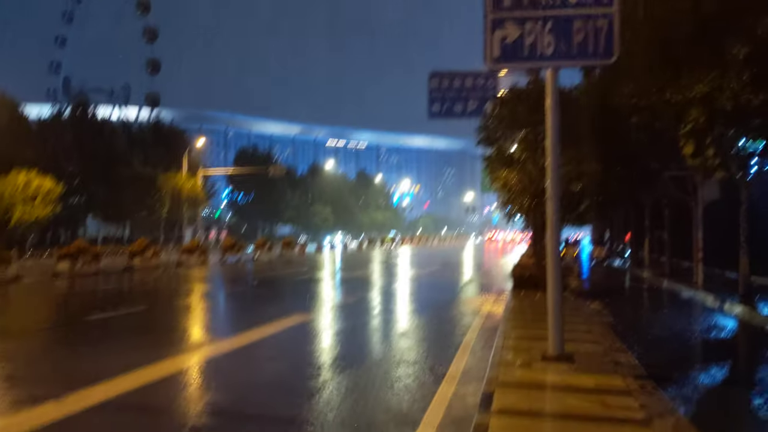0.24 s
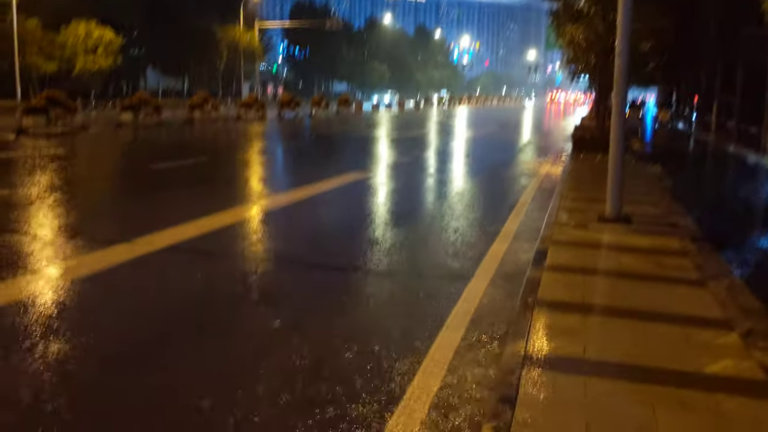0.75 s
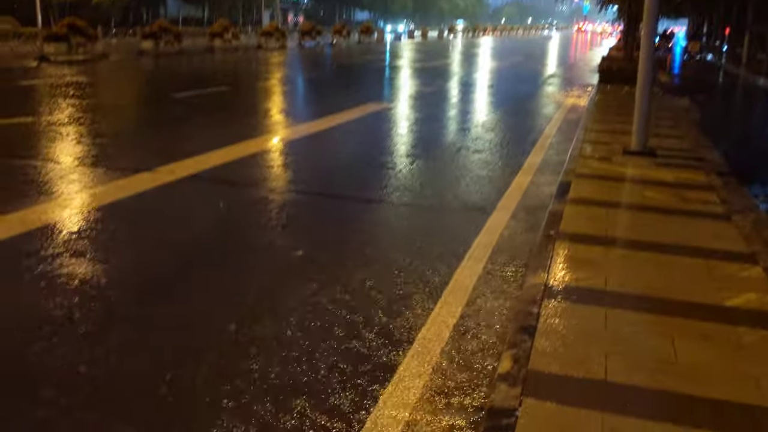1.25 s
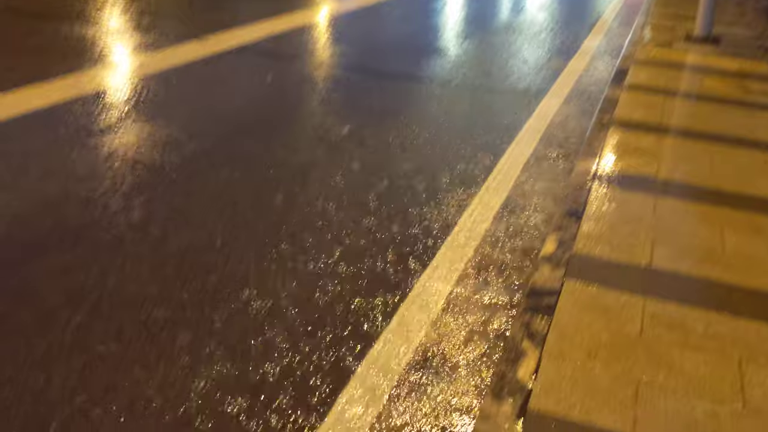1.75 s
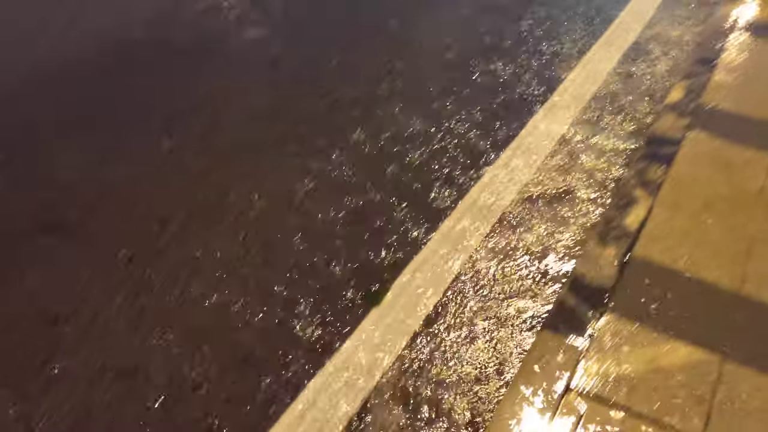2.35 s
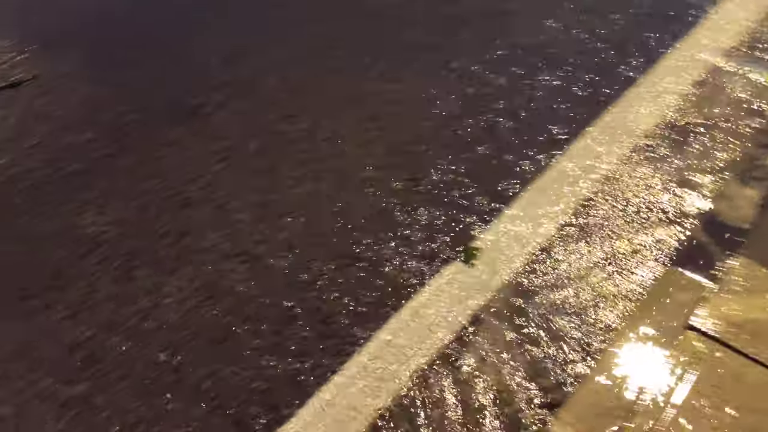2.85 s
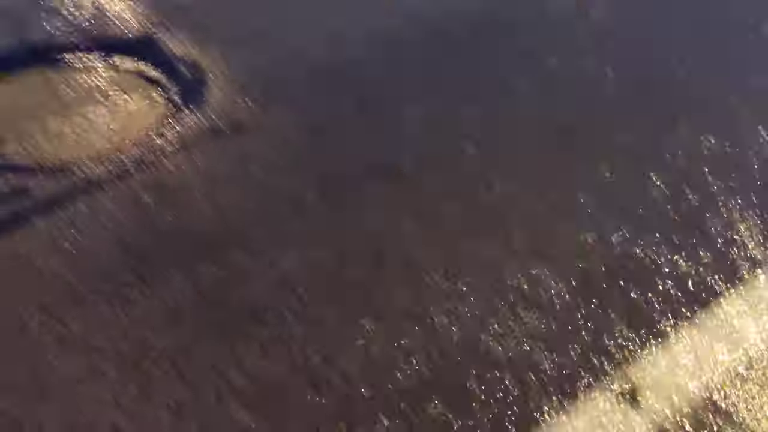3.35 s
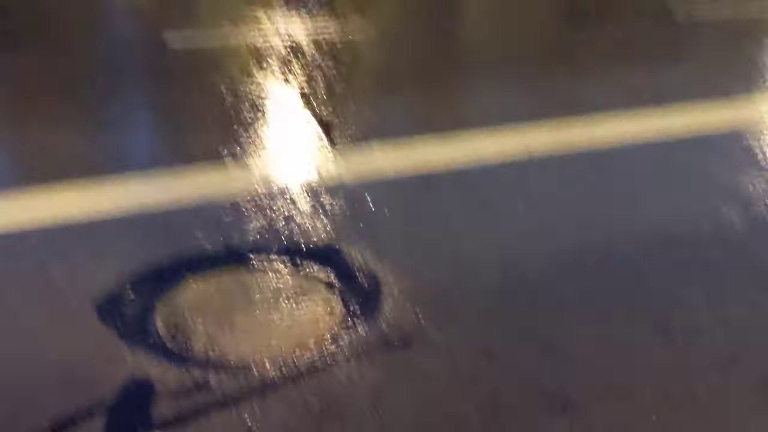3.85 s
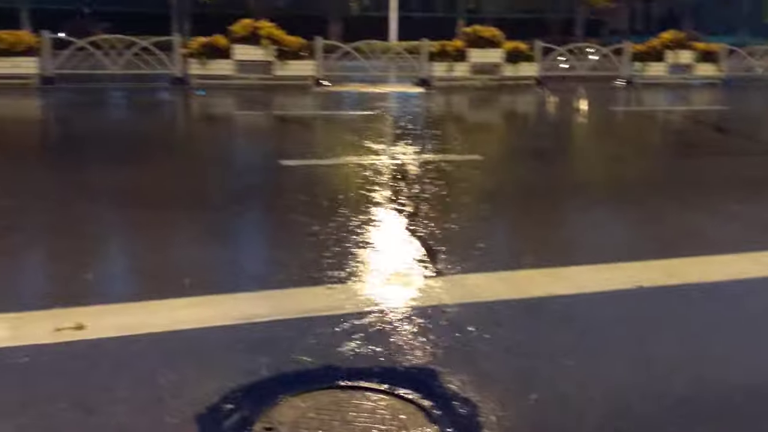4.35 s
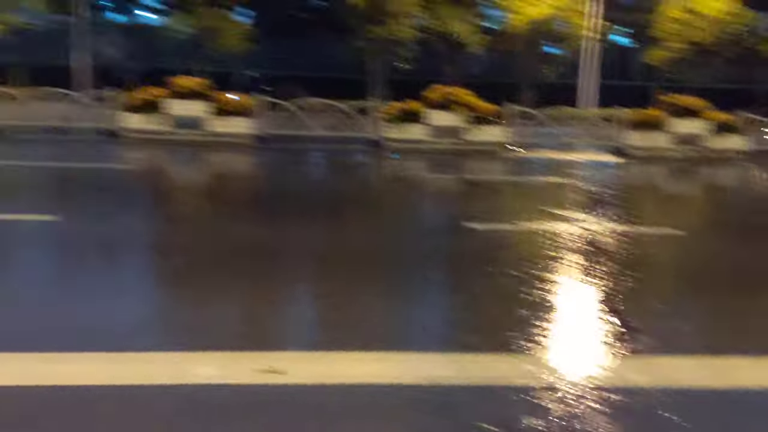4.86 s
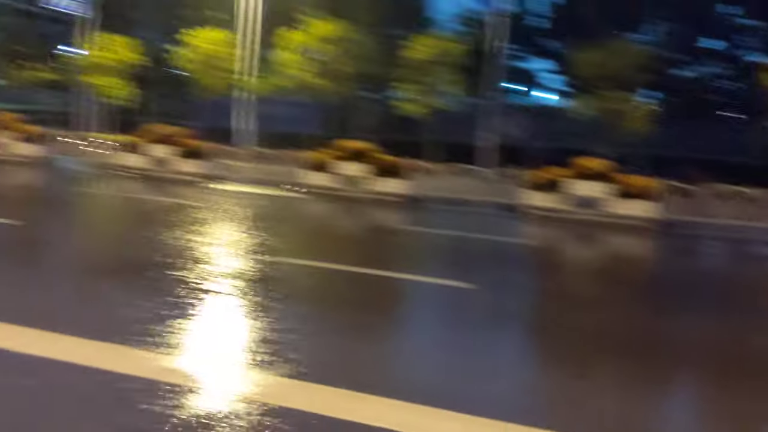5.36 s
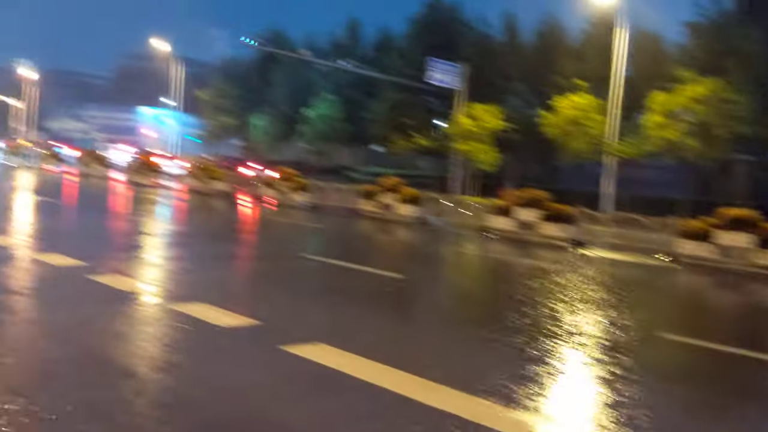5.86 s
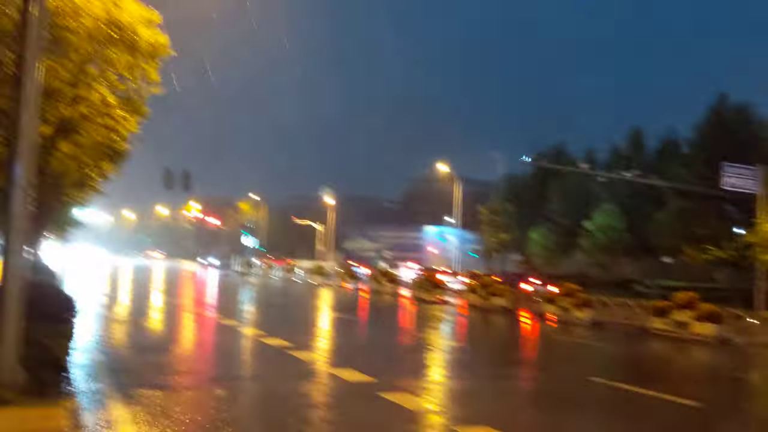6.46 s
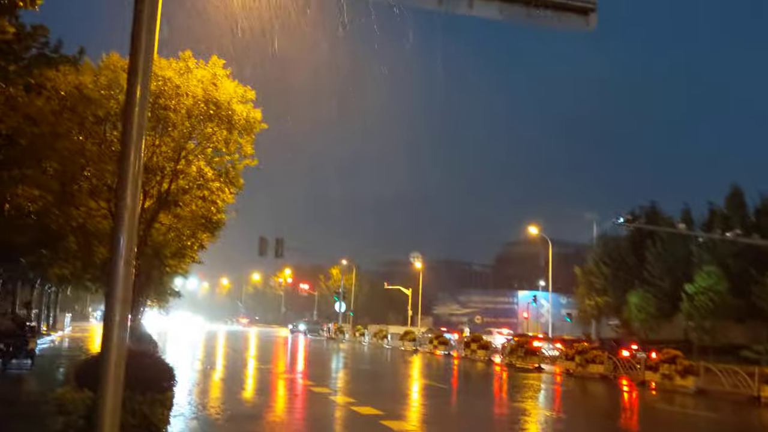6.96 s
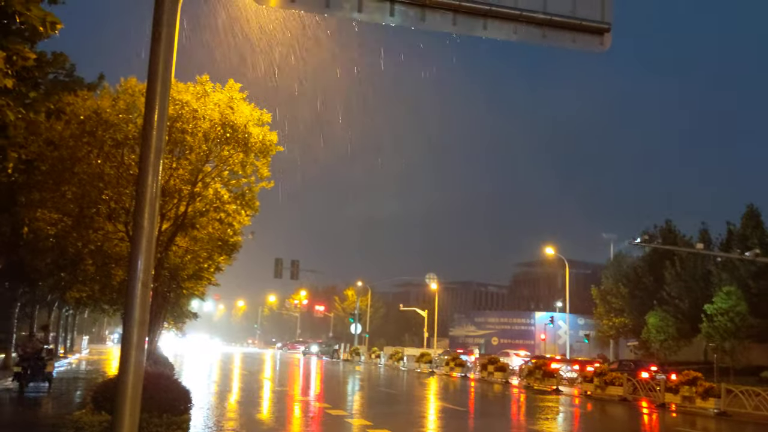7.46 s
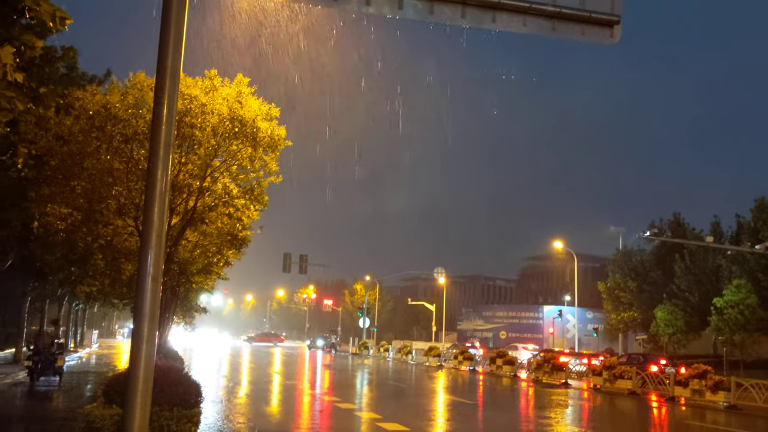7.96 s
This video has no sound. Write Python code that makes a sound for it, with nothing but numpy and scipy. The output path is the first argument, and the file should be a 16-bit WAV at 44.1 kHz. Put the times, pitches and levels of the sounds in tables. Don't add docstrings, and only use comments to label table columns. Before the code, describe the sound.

A heavy downpour on a wet street at night, heard through a hand-held stereo microphone being rained on. Throughout, a steady bright hiss of spray sits over a hollow, mid-low drumming on the casing, slightly different in each ear. In the first two seconds, distant cars swell as dull low drones, the clearest around 0.5 and 1.9, with a smack at 0.65 and light ticks. From 2 to 3.5 taps and wet spits grow denser, some with tiny bubble blips. Hard smacks land at 3.7, with a sharp burst on the right, then 3.8 and 4.0. A sparser pause follows. From about 5 wind puffs thump and flutter low, strongest at 5.9 to 6.5, amid big drops at 5.43, a loud right-side spit at 5.94, the heaviest smack at 6.3 and a plop at 6.5. Afterwards gusts thin out and the hiss brightens, especially after 7.5, with a few last drops and puffs by 8.2.

```python
import sys
import numpy as np
from scipy import signal
from scipy.fft import rfft, irfft, next_fast_len
from scipy.io import wavfile

SR = 44100
rng = np.random.default_rng(int(sys.argv[2]) if len(sys.argv) > 2 else 0)


def wav_record(signal):
    frames = np.transpose(np.atleast_2d(signal))
    bounded = np.clip(frames, -1, 1)
    quanta = np.round(bounded * 32767).astype(np.int16)
    wavfile.write(sys.argv[1], SR, quanta)


def ratio_of_db(decibels):
    return 10 ** (np.asarray(decibels, float) / 20)


N = 362943
T = np.arange(N) / SR

# (loudest at [s], level [dB], swell [s], fade by 10 dB [s])
VEHICLES = [
    (0.3, -45, .2, 0.08),
    (0.53, -38.5, 0.036, 0.21),
    (1.6, -58, 0.2, 1.1),
    (1.9, -43.5, 0.12, 0.18),
]
TRAFFIC_FLOOR_DB = -74.5
# (frequency [Hz], level per Hz [dB])
DRONE = [(120, -14), (190, -10), (245, 1), (295, -1), (370, -8.5), (700, -32.5), (3000, -94)]
# (time [s], frequency [Hz], half length [s], left [dB], right [dB])
FAR_WHINE = (8.03, 462.5, 0.2, -49, -53)

# (time [s], strength [dB])
WIND = [(0.0, -44), (0.4, -51), (0.6, -42), (0.95, -51.5), (2.4, -49), (4.8, -49.5), (4.9, -46.5),
        (5.2, -41.5), (5.48, -46), (5.58, -40), (5.84, -45.5), (5.92, -31), (5.99, -36), (6.15, -40),
        (6.43, -28.5), (6.47, -39.5), (7.8, -43), (7.92, -45.5), (8.23, -41.5)]
# (time [s], peak [dB])
PUFFS = [(4.999, -52), (5.13, -46), (5.164, -37), (5.214, -29), (5.569, -24), (5.666, -26), (5.774, -33),
         (5.868, -21), (5.89, -24), (5.938, -29), (5.998, -21.5), (6.034, -19), (6.076, -21.5),
         (6.104, -20.5), (6.128, -29), (6.155, -43), (6.184, -22.5), (6.278, -19), (6.299, -21.5),
         (6.329, -31), (6.36, -25.5), (6.382, -22), (6.41, -24), (6.428, -29), (6.643, -26), (6.732, -22.5),
         (6.956, -32.5), (7.14, -48), (7.27, -41), (7.319, -42), (7.573, -35.5), (7.74, -36),
         (7.789, -27.5), (7.87, -39), (8.13, -31)]
# (frequency [Hz], level per Hz [dB])
HEAVE = [(10, -19), (22, 11.5), (60, 2.5), (140, -1.5), (260, -18.5), (1000, -56), (5000, -110)]
FLUTTER = [(60, -2), (130, 3), (320, -5.5), (600, -20.5), (1200, -38), (2500, -48), (8000, -100)]
CRACKLE = [(100, -13.5), (300, 4.5), (450, -1.5), (800, -12.5), (1300, -18), (3000, -51), (8000, -100)]
GUSTS_FROM_S = 4.81
FLUTTER_DB, FLUTTER_FOLLOWS, WIND_MID_DB = -47.5, 1.48, -40.5
# (time [s], length [s], left [full scale], right [full scale])
PUSHES = [(0.649, 0.021, -0.058, -0.041), (3.7176, 0.0051, 0.32, -0.12), (3.7205, 0.0027, -0.23, 1),
          (3.7195, 0.0029, 0.24, -0.087), (3.726, 0.035, -0.0085, -0.072), (4.89, 0.011, -.11, -0.044),
          (4.895, 0.0076, 0.015, -0.15), (5.575, 0.0035, -0.088, -0.083), (5.659, 0.018, -0.1, -0.095),
          (5.677, 0.0044, 0.049, 0.074), (5.897, 0.0027, 0.041, 0.039), (6.276, 0.0026, 0.29, 0.22),
          (6.396, 0.0056, 0.12, 0.14), (6.414, 0.0061, -0.12, -0.083)]

# (time [s], frequency [Hz], half length [s], left [dB], right [dB])
BUBBLES = [
    (2.2132, 2650, 0.00056, -24, -40),
    (2.557, 1250, 0.00071, -23, -28),
    (2.671, 2100, 0.00053, -27, -40),
    (3.562, 2930, 0.00034, -22, -30),
    (3.8103, 2700, 0.00044, -19, -30),
    (3.9988, 3620, .0003, -19, -40),
    (5.0985, 3200, 0.00055, -36, -18),
    (5.43, 1060, 0.001, -13, -17),
    (5.4292, 3300, 0.00057, -18, -22),
    (6.2785, 1090, 0.00068, -20, -25),
]
# (time [s], frequency [Hz], half length [s], left [dB], right [dB])
PLOP = (6.5052, 1550, .00055, -6.5, -18)

# (time [s], left [dB], right [dB])
THUDS = [(2.213, -32, -26), (2.5308, -26, -22.5), (2.617, -25, -23.5), (3.5619, -17, -21),
         (3.689, -20, -18), (3.717, -33, -19), (5.0985, -20, -17.5), (5.1196, -20.5, -17),
         (5.4555, -22, -20), (0.6524, -22, -24), (6.3138, -40, -15.5)]
# (frequency [Hz], level [dB])
ROCK = [(150, -22), (330, -8.5), (490, 1), (700, -6), (1150, -16), (1700, -27), (4000, -70)]
ROCK_TURN = 2.4

# (time [s], drumming on the shell [dB], spray [dB], spray's lean to the left port [dB])
RAIN = [(0.0, -45.5, -50.5, 0.5), (0.45, -42.5, -51.5, 2), (0.55, -39, -50.5, 1.5), (0.72, -43.5, -52, 0),
        (0.98, -45.5, -51.5, -0.5), (1.49, -45.5, -52.5, 0.5), (1.92, -43, -51, 0.5), (2.86, -45, -53.5, 2),
        (3.83, -44.5, -52.5, 0.5), (4.9, -44.5, -52, 0.5), (5.4, -44.5, -49, 1), (5.75, -44, -49.5, 1.2),
        (6.0, -45, -49, 1), (6.6, -45, -49.5, 1), (7.1, -45.5, -49, 2), (7.4, -45, -48, 1),
        (7.68, -44, -45.5, -0.5), (7.98, -43, -46, -4.5), (8.23, -44, -46.5, -3.5)]
# (frequency [Hz], level per Hz [dB])
LEFT_PORT = [(2400, -3.1), (2900, -9.3), (4000, -9.9), (4900, -15.7), (5700, -10.6), (6500, -12.6),
             (7700, -3.6), (8800, -5.5), (10000, -8.2), (11300, -17.7), (12100, -21.8), (12600, -28.0),
             (14800, -27.3), (15900, -35.5)]
RIGHT_PORT = [(2400, -14.6), (3200, -4.0), (3900, 2.8), (4900, -5.4), (5500, -5.7), (6500, -17.7),
              (7700, -19.7), (8500, -48.9), (9500, -32.0), (10700, -38.5), (11900, -30.4), (12900, -38.9),
              (14000, -33.1), (15700, -56.9)]
WHISTLE_HZ, WHISTLE_WIDTH_HZ = 7700, 790
BEAD_UNTIL_S, BEAD_LOW_HZ, BEAD_HIGH_HZ, BEAD_SHARE = 0.65, 9500, 12300, 0.76

# (time [s], level [dB])
LEFT_SPITS = [(1.9167, -23), (2.213, -31), (2.9376, -19.5), (3.3716, -31), (3.561, -31), (3.689, -12.5),
              (3.9132, -17), (3.999, -13), (4.2615, -21), (5.46, -25), (5.518, -23), (5.676, -25),
              (5.947, -27), (6.2683, -25), (7.155, -21.5), (7.679, -20), (.087, -30), (1.198, -32),
              (1.662, -26), (1.9632, -25), (2.7973, -32), (3.1173, -30), (3.2149, -30), (3.4507, -27),
              (3.6235, -28), (5.0812, -24), (5.3121, -23), (5.4, -26), (5.4287, -23), (5.584, -25),
              (5.7337, -28), (5.927, -26), (7.397, -23), (7.552, -24), (7.6194, -24),
              (2.276, -30), (2.429, -32), (2.671, -35), (3.151, -30), (4.05, -29), (5.125, -27),
              (5.317, -24), (5.361, -30), (5.411, -29), (5.485, -30), (5.496, -28), (5.718, -31),
              (5.783, -28), (5.874, -29), (5.969, -28), (6.194, -23), (6.261, -27), (6.389, -26),
              (7.268, -27), (7.402, -36), (7.5, -29), (7.692, -23), (7.786, -33), (7.971, -25),
              (8.017, -25)]
# (time [s], level [dB], brightness above the port's ring [dB per octave])
RIGHT_SPITS = [(1.178, -18.5, 0), (1.2216, -29, -2), (2.4292, -20.5, -6), (2.5306, -16, 0),
               (2.5566, -22, -2), (2.6185, -23, -5), (3.099, -20.5, -7), (3.152, -18, 1),
               (3.2145, -24.5, -8), (3.5633, -17.5, -5), (3.717, -19, -5), (3.7182, -11, 0),
               (3.718, -12, 3), (3.7201, -8, -2), (3.72, -9, 3), (3.7203, -15, 10), (3.7238, -27, 5),
               (3.732, -28, 0), (3.7324, -14, 9), (3.8, -12, 1), (4.115, -18, -6), (4.238, -24, -7),
               (4.508, -22.5, -5), (4.815, -24, -7), (5.119, -10.5, -4), (5.4558, -21, 0), (5.939, 1, 3),
               (5.9401, -3, -3), (5.9807, -22, -7), (6.109, -18.5, 2), (6.225, -27, -5), (6.2493, -23, -2),
               (6.457, -30, -3), (0.086, -28, 3), (.101, -30, -4), (.384, -28, -4), (.39, -29, -4),
               (1.199, -29, -3), (1.917, -29, 1), (2.077, -27, -4), (2.444, -28, -5), (2.526, -29, -5),
               (2.613, -23, -8), (3.874, -28, 5), (4.382, -36, 8), (4.428, -31, 3), (5.651, -30, -3),
               (6.189, -26, -1), (6.261, -30, -5), (6.501, -21, -9), (6.628, -24.5, -5), (7.012, -28, -3),
               (7.1545, -28, 4), (7.68, -28, 7), (7.692, -32, 7), (7.764, -29, 7), (8.064, -29, -8),
               (8.111, -27, -8), (8.142, -19, -6), (5.734, -34, 5)]
# (time [s], left [dB], right [dB])
SHARED_SPITS = [(1.2702, -27.5, -22), (1.6897, -24, -25), (1.81, -25, -23), (1.9794, -27, -25),
                (2.7198, -40, -26.5), (3.025, -26, -26), (3.663, -24, -24), (3.8102, -23, -27),
                (5.0252, -25, -23), (5.0974, -26, -16), (5.4287, -20, -14), (5.5363, -21, -23),
                (5.5524, -29, -22), (5.699, -21, -20.5), (5.8333, -26, -15.5), (5.963, -28, -31),
                (6.9714, -27, -26), (7.07, -26, -16.5), (7.1289, -28, -17.5), (7.879, -27, -20),
                (8.1379, -20, -23)]
# (frequency [Hz], level [dB])
WET_PORT = [(2300, -26), (3000, -9), (3800, 1.5), (4500, -7.5), (5400, -8), (6500, -18), (7600, -20.5),
            (9000, -31), (11000, -33), (16000, -30)]
MIST_LEFT_DB, MIST_RIGHT_DB = -35.5, -38
SHARED_SHINE_DB, MIST_SHINE_DB = -4.5, 0

# (time [s], centre of its ring [Hz], left [dB], right [dB])
SMACKS = [(0.6518, 1790, -16.5, -33), (1.1777, 2070, -19.5, -26), (1.7624, 970, -16.5, -30),
          (2.213, 2000, -16, -43), (2.5303, 980, -14.5, -25), (2.5571, 960, -11, -14.5),
          (3.1533, 1900, -20, -19), (3.5624, 1190, -13, -11.5), (3.689, 1340, -5, -22),
          (3.7182, 1040, -8, -4.5), (3.7158, 1500, -24, -13), (3.8, 1520, -34, -18),
          (3.8101, 890, -2.5, -16), (3.9983, 2450, -4, -44), (4.227, 2380, -21, -53),
          (5.0246, 1070, -15, -25), (5.0983, 1305, -15, -14), (5.1194, 1450, -13.5, -14),
          (5.429, 1100, -3, -9), (5.4552, 1450, -14.5, -16), (5.94, 2320, -40, -27),
          (5.9402, 1490, -40, -14.5), (5.9685, 1230, -13.5, -30), (6.0075, 715, -17.5, -40),
          (6.0156, 1410, -18, -38), (6.1086, 1540, -16, -22), (6.2573, 870, -17, -26),
          (6.277, 696, -17, -29), (6.3139, 2010, 1.5, -10.5), (8.158, 1260, -16, -31)]
# (time [s], centre of its ring [Hz], left [dB])
TAPS = [(0.2119, 820, -21), (0.88, 774, -22.5), (1.0992, 1550, -23.5), (1.8097, 1210, -24),
        (1.9794, 1050, -22), (2.152, 725, -21.5), (2.429, 2060, -27), (2.5728, 720, -21),
        (2.617, 1600, -22), (2.6717, 890, -15.5), (2.72, 970, -20), (3.099, 1080, -21.5),
        (3.118, 1120, -23), (3.1746, 870, -17), (3.2149, 1900, -19.5), (3.27, 750, -19.5),
        (3.3716, 820, -17.5), (3.3912, 990, -21.5), (3.5306, 950, -18), (3.664, 2110, -24),
        (3.9573, 1110, -18.5), (4.115, 1180, -17), (4.4287, 910, -16), (4.508, 1020, -18),
        (5.4595, 850, -28), (5.963, 1160, -17.5), (6.05, 1030, -20), (6.143, 2300, -23), (6.5, 890, -14.5),
        (6.5046, 600, -18.5)]
TAP_FAR_LOSS_DB = 7.5
# (time [s], centre of its ring [Hz], left [dB], right [dB])
KNOCKS = [(.665, 1200, -23, -34), (1.171, 800, -25.5, -33), (1.223, 750, -25, -26.5),
          (1.255, 750, -42, -31), (2.061, 1600, -29, -38), (2.361, 2200, -28, -40), (2.681, 750, -29, -38),
          (2.742, 1400, -26, -37), (3.696, 750, -31, -38), (3.874, 1900, -30, -23), (3.936, 900, -29, -31),
          (4.2385, 1300, -26, -26), (4.384, 1600, -43, -36), (4.746, 1600, -32, -37),
          (4.8167, 1700, -30, -33), (5.067, 1600, -30, -36), (5.334, 2200, -33, -35),
          (5.659, 1400, -28, -33), (5.743, 1700, -28, -35), (5.782, 2100, -28, -40),
          (6.175, 1000, -30, -35), (6.25, 1700, -28, -31), (6.291, 750, -22, -32), (6.375, 750, -21, -34),
          (6.41, 750, -20, -30), (6.434, 1600, -35, -36), (6.444, 750, -23, -34), (6.474, 750, -25, -33),
          (6.587, 750, -23.5, -29), (6.737, 750, -26, -43), (7.703, 750, -28.5, -34),
          (7.764, 1600, -27, -35), (7.825, 2000, -27, -38), (7.847, 1600, -33, -38),
          (7.901, 1150, -24, -33), (8.135, 1760, -17.5, -33), (6.314, 1900, -24, -32)]
# (frequency [Hz], left [dB], right [dB], right leads [radians])
BLOW = [(198, -17, -16, 2.5), (475, -7.5, -4, 2.5), (820, 1.5, -3, 2), (1120, -6, -10, 1.65),
        (1450, -14.5, 0, 1.17), (1800, -2, -8, 0.56), (2300, -4.5, -13, 2.0), (2830, -13.5, -19, 2.5),
        (3280, -16.5, -17, 1.5), (6000, -31, -44, 2), (16000, -77, -75, 4)]
# (frequency [Hz], left per Hz [dB], right per Hz [dB])
SHELL = [(150, 4, 0), (300, 4, -5), (450, 3.5, -7), (620, 5, -2), (800, 9.5, 5), (950, 2.5, 0),
         (1130, -4, -8), (1400, 4.5, -3), (1680, 9.5, -2), (2000, 3.5, -10), (2400, -3.5, -17),
         (2900, -10, -22)]
# (frequency [Hz], likeness [0-1], right leads [radians])
COUPLING = [ (60, .8, 0), (250, .4, .8), (430, .7, 2.2), (800, .93, 1.8), (1050, .7, 1.8), (1200, .3, .7),
            (1350, .5, -.1), (1800, .68, -.1), (2150, .25, 1.5)]


def rms_one(x):
    return x / np.sqrt(np.mean(x ** 2, axis=-1, keepdims=True) + 1e-20)


def in_time(rows):
    s, *columns = np.transpose(rows)
    return [np.interp(T, s, column) for column in columns]


def at_hz(points, hz, axis=1):
    points = np.array(points)
    return np.interp(np.log(hz + 1e-9), np.log(points[:, 0]), points[:, axis])


def causal(db, size):
    cepstrum = irfft(np.log(ratio_of_db(db)), size)
    cepstrum[..., 1:size // 2] *= 2
    cepstrum[..., size // 2 + 1:] = 0
    return np.exp(rfft(cepstrum, size))


def skirts(hz, low_hz, high_hz):
    return -10 * np.log10((1 + (low_hz / (hz + 1)) ** 8) * (1 + (hz / high_hz) ** 12))


def coloured(x, points, low_hz=5, high_hz=19000):
    hz = np.fft.rfftfreq(8192, 1 / SR)
    response = irfft(causal(at_hz(points, hz) + skirts(hz, low_hz, high_hz), size=8192))
    return rms_one(signal.oaconvolve(x, response)[:N])


def drift(rate):
    r = np.exp(-40 * np.pi * rate / SR)
    noise = rng.standard_normal(N // 20 + 3002)
    slow = signal.lfilter([1], [1, -2 * r, r * r], noise)[3000:]
    return np.interp(np.arange(N) / 20, np.arange(len(slow)), rms_one(slow))


def patter(per_s, spread_db, share, patchy_db):
    sizes = ratio_of_db(spread_db * np.minimum(rng.exponential(1, N), 4)) * rng.choice([-1, 1], N)
    hits = sizes * (rng.random(N) < per_s * ratio_of_db(4 * drift(12)) / SR)
    share = np.clip(share, 0, 1)
    far = rng.standard_normal(N) * ratio_of_db(patchy_db * drift(17.3))
    return np.sqrt(share) * rms_one(hits) + np.sqrt(1 - share) * rms_one(far)


def splashes(count, burst_s, sharp):
    t = np.arange(1024) / SR
    splash = (rng.standard_normal((count, 1024)) + sharp * (t == 0)) * np.exp(-t / burst_s)
    return rfft(np.roll(splash, 64, axis=1))


def laid_out(spectra, s, level_db):
    fade = np.minimum(1, np.linspace(3, 0, 1024) ** 2)
    shapes = irfft(spectra, 1024) * fade
    shapes = shapes / np.abs(shapes).max(axis=1, keepdims=True) * ratio_of_db(level_db)[:, None]
    out = np.zeros(N + 1024)
    places = (s[:, None] * SR).astype(int) - 64 + np.arange(1024)
    np.add.at(out, places, shapes)
    return out[:N]


def soft_tones(rows):
    out = np.zeros((2, N))
    for s, hz, half_s, left_db, right_db in rows:
        swell = np.exp(-0.5 * ((T - s) / half_s) ** 2)
        out += np.sin(2 * np.pi * hz * (T - s)) * swell * ratio_of_db([[left_db], [right_db]])
    return out


def traffic():
    gain = ratio_of_db(TRAFFIC_FLOOR_DB)
    for s, db, swell_s, fade_s in VEHICLES:
        gain = gain + ratio_of_db(db - 10 * np.maximum((s - T) / swell_s, (T - s) / fade_s))
    drone = [coloured(rng.standard_normal(N) * ratio_of_db(1.9 * drift(4.2)), DRONE) for port in range(2)]
    ports = np.array([drone[0], 0.19 * drone[0] + 0.14 * drone[1]])
    return (1 - gusting()) * ratio_of_db(3.0) * gain * ports


def gusting():
    return np.clip((T - GUSTS_FROM_S) * 50, 0, 1)


def puffs(rise_s, fall_s):
    marks = np.zeros(N)
    marks[[int(s * SR) for s, db in PUFFS]] = ratio_of_db(np.array(PUFFS)[:, 1] - 5.0)
    age = np.arange(4000) / SR
    return signal.oaconvolve(marks, (1 - np.exp(-age / rise_s)) * np.exp(-age / fall_s))[:N]


def wind():
    heave_db, = in_time(WIND)
    flutter_db = FLUTTER_DB + FLUTTER_FOLLOWS * (heave_db - WIND_MID_DB)
    eddy_db = 20 * np.log10(ratio_of_db(flutter_db) + np.abs(puffs(rise_s=0.0027, fall_s=0.013)))
    lumps = [patter(per_s=140, spread_db=3.5, share=0.35, patchy_db=2.5) for lump in range(3)]
    heave, flutter, crackle = [[coloured(x, points) for x in lumps] for points in (HEAVE, FLUTTER, CRACKLE)]
    heave = ratio_of_db(heave_db - 1.5) * (heave[0] + 0.46 * np.array(heave[1:]))
    flutter = ratio_of_db(eddy_db + 1.5) * (flutter[0] + 0.5 * np.array(flutter[1:]))
    crackle = ratio_of_db(2.0 * (eddy_db + 28.0) - 34.5) * (crackle[0] + 0.5 * np.array(crackle[1:]))
    return heave + gusting() * (flutter + crackle)


def pushes():
    out = np.zeros((2, N))
    for s, length_s, left, right in PUSHES:
        bump = np.hanning(max(int(length_s * SR), 3))
        start = int(s * SR)
        out[:, start:start + len(bump)] += bump * [[left], [right]]
    return signal.lfilter(*signal.butter(1, 9.0, "high", fs=SR), out)


def spray(shell_db, left_db, right_db):
    falling = patter(per_s=420, spread_db=4.5, share=0.27, patchy_db=1.0)
    low = ratio_of_db(shell_db - 10.0) * coloured(falling, LEFT_PORT, low_hz=2700, high_hz=5100)
    high = coloured(falling, LEFT_PORT, low_hz=5070)
    bead = signal.butter(1, [BEAD_LOW_HZ, BEAD_HIGH_HZ], "band", fs=SR, output="sos")
    high = high - BEAD_SHARE * (T < BEAD_UNTIL_S) * signal.sosfilt(bead, high)
    whistle = signal.iirpeak(WHISTLE_HZ, WHISTLE_HZ / WHISTLE_WIDTH_HZ, fs=SR)
    sung = rms_one(signal.lfilter(*whistle, high))
    left = low + ratio_of_db(left_db + 2.0) * (high + ratio_of_db(3.3 * (left_db + 48.5) - 13) * sung)
    falling_right = patter(per_s=380, spread_db=4.0, share=0.21, patchy_db=0.74)
    right = ratio_of_db(right_db + 6) * coloured(falling_right, RIGHT_PORT, low_hz=2860)
    top_cut = signal.cheby2(10, 50, 16450, fs=SR, output="sos")
    return signal.sosfilt(top_cut, np.array([left, right]))


def bubbles():
    return soft_tones(BUBBLES + [PLOP])


def thuds():
    s, left_db, right_db = np.transpose(THUDS)
    hz = np.fft.rfftfreq(1024, 1 / SR)
    rock = splashes(len(s), burst_s=0.0003, sharp=9.0) * causal(at_hz(ROCK, hz), size=1024)
    return np.array([laid_out(rock, s, left_db), laid_out(rock * np.exp(1j * ROCK_TURN), s, right_db)])


def shell_drops():
    taps = [(s, hz, db, db - TAP_FAR_LOSS_DB) for s, hz, db in TAPS]
    return np.array(SMACKS + taps + KNOCKS)


def port_spits():
    hz = np.fft.rfftfreq(1024, 1 / SR)
    drop_s = shell_drops()[:, 0]

    left_rows = [(s, db) for s, db, _ in SHARED_SPITS] + [(s, MIST_LEFT_DB) for s in drop_s]
    left_s, left_db = np.transpose(left_rows)
    pipe = causal(1.24 * at_hz(LEFT_PORT, hz) + np.maximum(skirts(hz, 3400, 22000), -40), size=1024)
    left = laid_out(splashes(len(left_s), burst_s=0.00085, sharp=1.47) * pipe, left_s, left_db)

    lone_s, lone_db = np.transpose(LEFT_SPITS)
    pipe = causal(1.2 * at_hz(LEFT_PORT, hz) + np.maximum(skirts(hz, 4700, 22000), -35), size=1024)
    left = left + laid_out(splashes(len(lone_s), burst_s=0.00067, sharp=2.2) * pipe, lone_s, lone_db)

    shared = [(s, db, SHARED_SHINE_DB) for s, _, db in SHARED_SPITS]
    mist = [(s, MIST_RIGHT_DB, MIST_SHINE_DB) for s in drop_s]
    right_s, right_db, shine_db = np.transpose(RIGHT_SPITS + shared + mist)
    bright_db = shine_db[:, None] * np.log2(np.maximum(hz / 4300, 1))
    pipe = causal(at_hz(WET_PORT, hz) + bright_db + skirts(hz, 1970, 25000), size=1024)
    right = laid_out(splashes(len(right_s), burst_s=0.00023, sharp=4.9) * pipe, right_s, right_db)
    return np.array([left, right])


def big_drops():
    s, ring_hz, left_db, right_db = shell_drops().T
    hz = np.fft.rfftfreq(1024, 1 / SR)
    octave = np.clip(np.log2((hz + 1) / 1200), -1.6, 1.12)
    tilt_db = 14.2 * np.log2(ring_hz[:, None] / 1150) * octave
    contact = splashes(len(s), burst_s=0.0005, sharp=4.0)
    near = contact * causal(at_hz(BLOW, hz) + tilt_db, size=1024)
    crossing = ratio_of_db(at_hz(BLOW, hz, axis=2) - at_hz(BLOW, hz)) * np.exp(1j * at_hz(BLOW, hz, axis=3))
    return np.array([laid_out(near, s, left_db), laid_out(near * crossing, s, right_db)])


def drumming(level_db):
    shared = patter(per_s=260, spread_db=4.0, share=0.17, patchy_db=0.85)
    own = patter(per_s=180, spread_db=2.0, share=0.041, patchy_db=1.5)
    size = next_fast_len(N + 4096)
    hz = np.fft.rfftfreq(size, 1 / SR)
    left = rfft(coloured(shared, SHELL, low_hz=140, high_hz=2360), size)
    apart = rfft(coloured(own, SHELL, low_hz=140, high_hz=2450), size)
    alike = np.clip(at_hz(COUPLING, hz), 0, 1)
    turn = np.exp(1j * at_hz(COUPLING, hz, axis=2))
    right = alike * left * turn + np.sqrt(1 - alike ** 2) * apart
    right = right * ratio_of_db(at_hz(SHELL, hz, axis=2) - at_hz(SHELL, hz))
    return ratio_of_db(level_db + 3.5) * irfft(np.array([left, right]), size)[:, :N]


def scene():
    shell_db, spray_db, lean_db = in_time(RAIN)
    street = traffic() + soft_tones([FAR_WHINE])
    buffeting = wind() + pushes()
    hiss = spray(shell_db, spray_db + lean_db / 2, spray_db - lean_db / 2)
    drops = bubbles() + thuds() + port_spits() + big_drops()
    return street + buffeting + hiss + drops + drumming(shell_db)


def band_limit(x):
    return signal.sosfilt(signal.butter(12, 17030, fs=SR, output="sos"), x)


def record(dry):
    rounded = 0.8 * np.tanh(dry / 0.8)
    top_cut = signal.cheby2(12, 60, 17100, fs=SR, output="sos")
    mix = signal.sosfilt(top_cut, rounded)
    return band_limit(mix)


dry = scene()
out = record(dry)
wav_record(out)
```